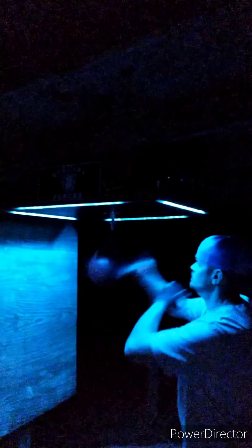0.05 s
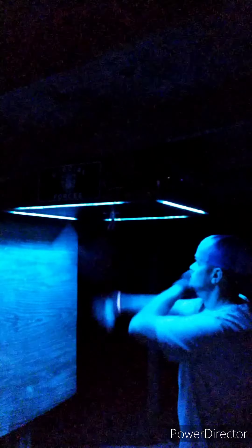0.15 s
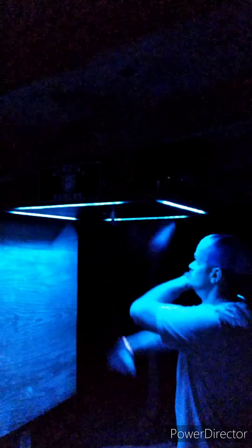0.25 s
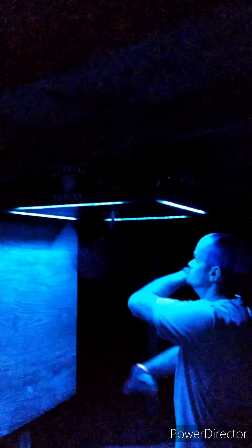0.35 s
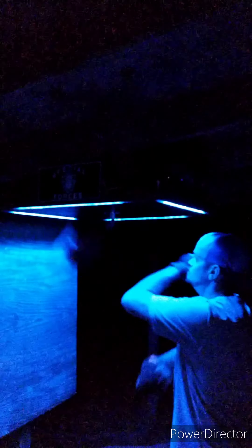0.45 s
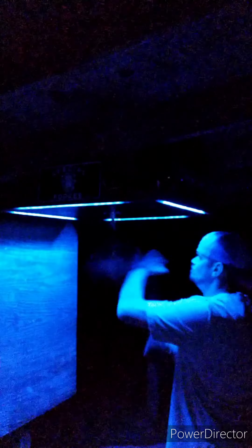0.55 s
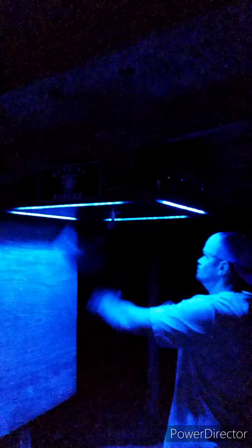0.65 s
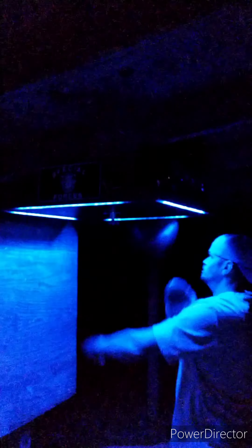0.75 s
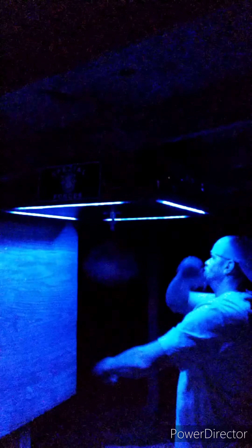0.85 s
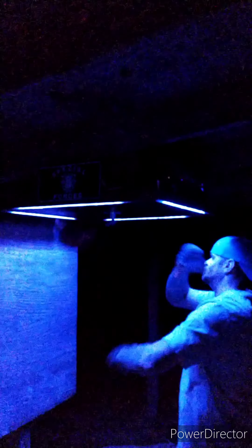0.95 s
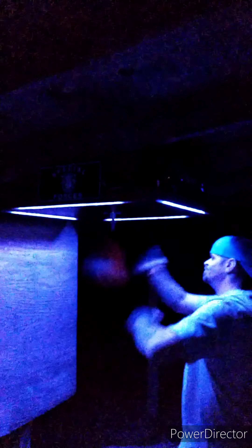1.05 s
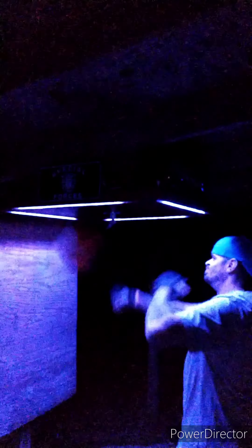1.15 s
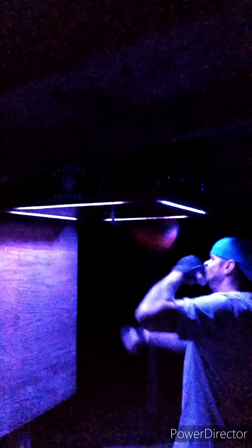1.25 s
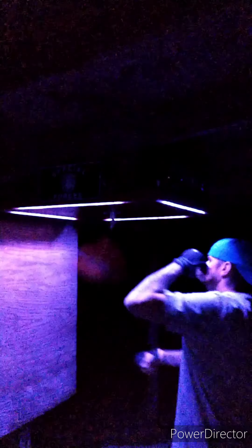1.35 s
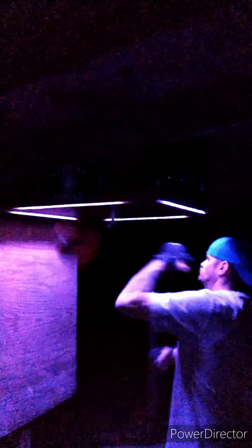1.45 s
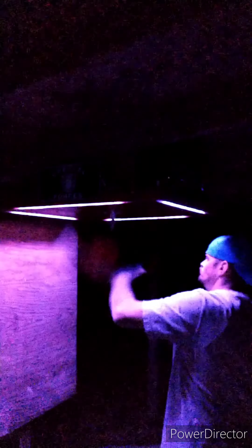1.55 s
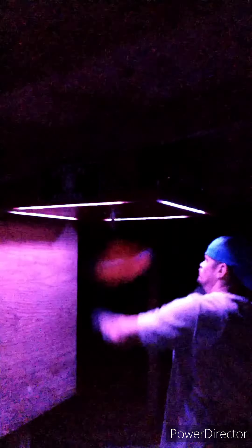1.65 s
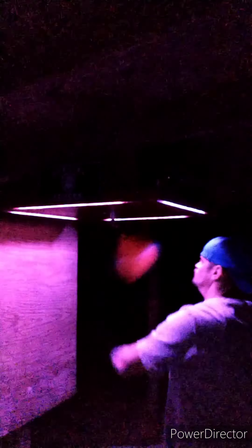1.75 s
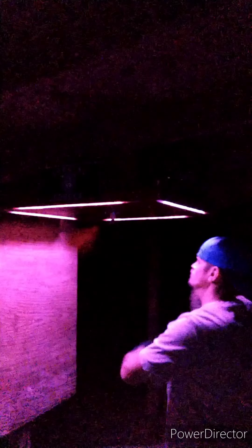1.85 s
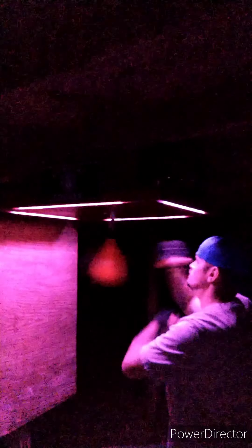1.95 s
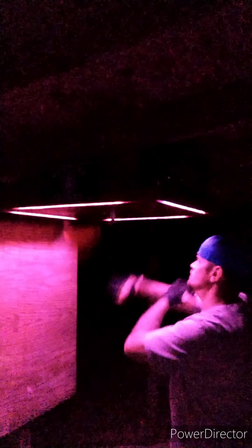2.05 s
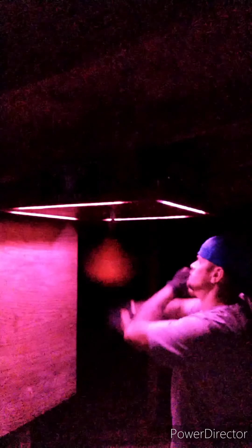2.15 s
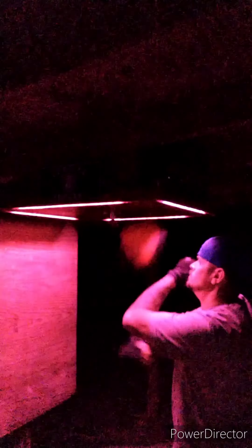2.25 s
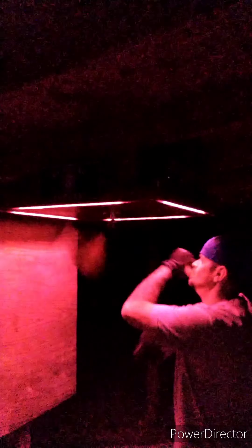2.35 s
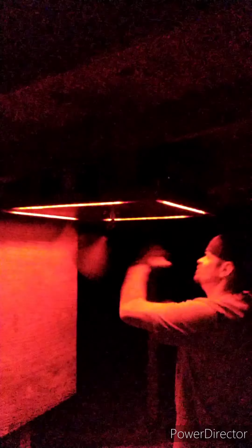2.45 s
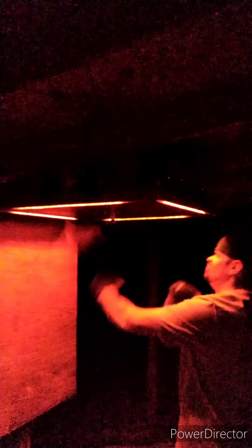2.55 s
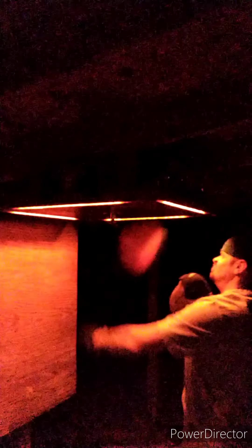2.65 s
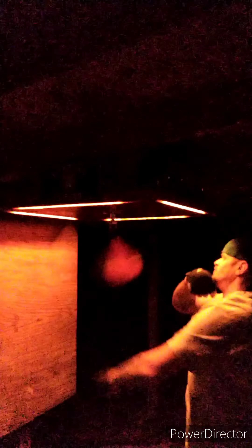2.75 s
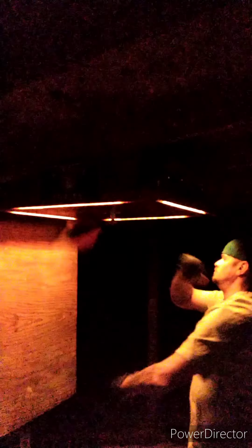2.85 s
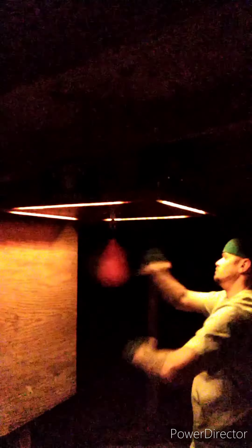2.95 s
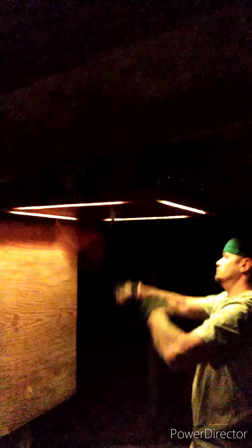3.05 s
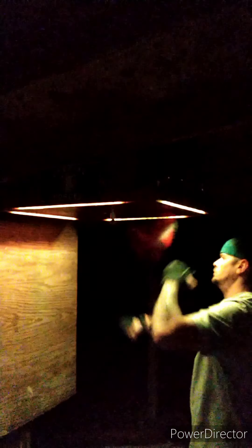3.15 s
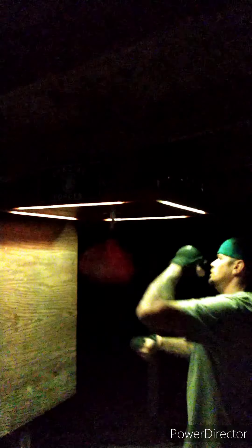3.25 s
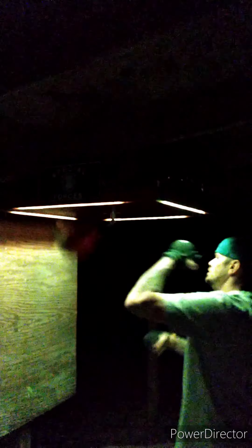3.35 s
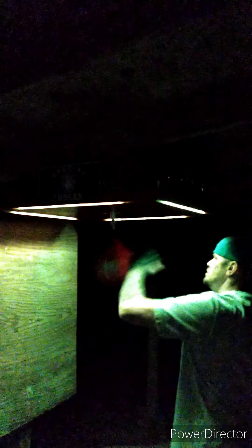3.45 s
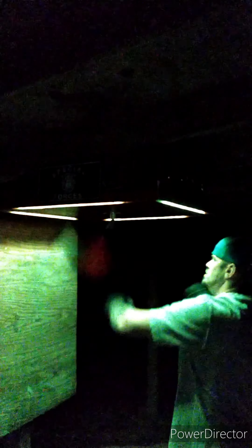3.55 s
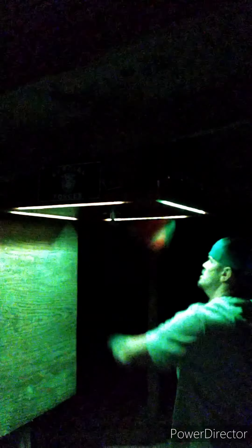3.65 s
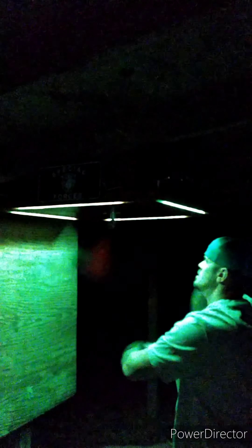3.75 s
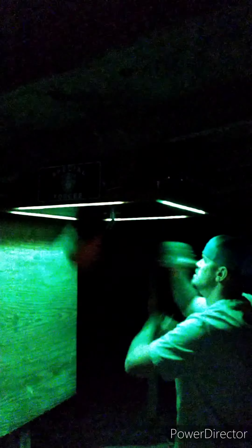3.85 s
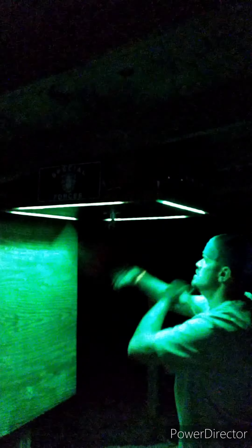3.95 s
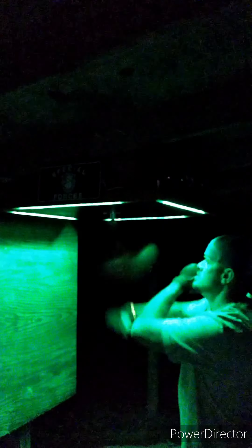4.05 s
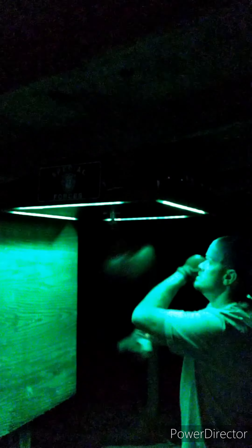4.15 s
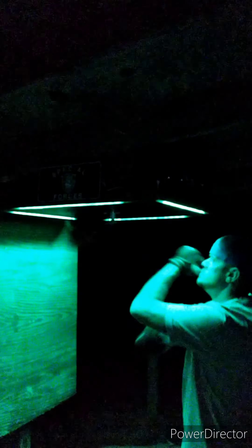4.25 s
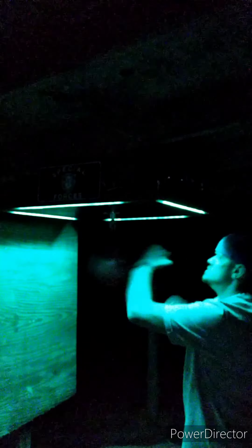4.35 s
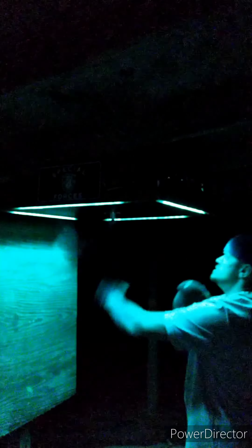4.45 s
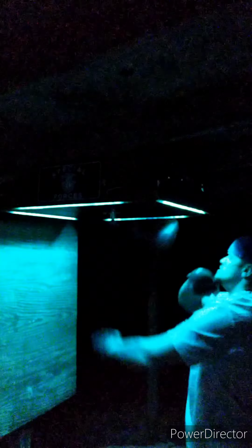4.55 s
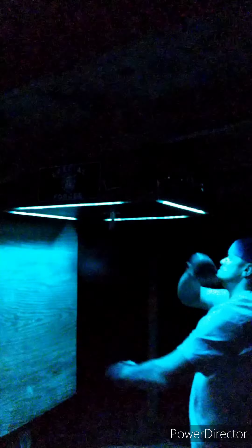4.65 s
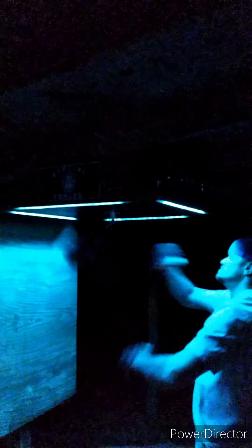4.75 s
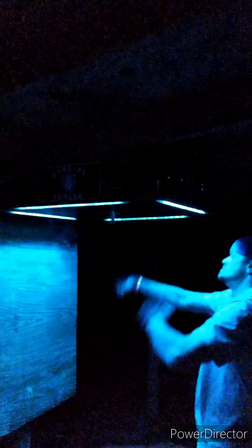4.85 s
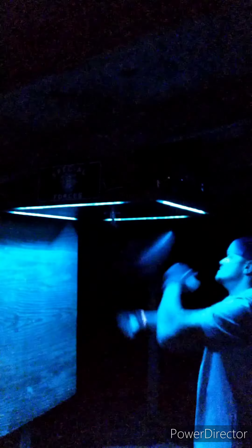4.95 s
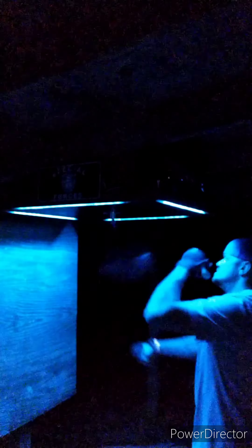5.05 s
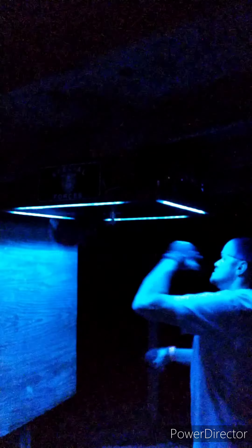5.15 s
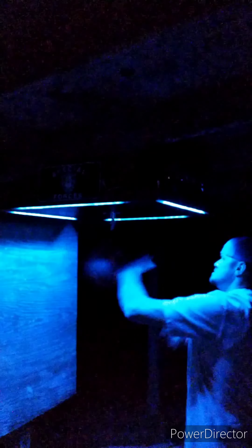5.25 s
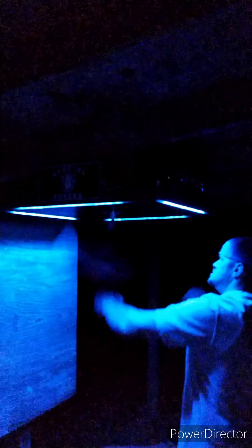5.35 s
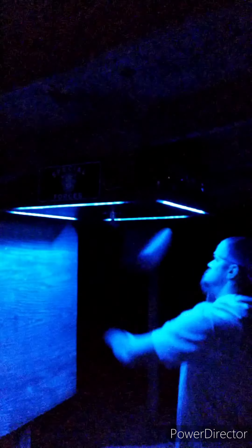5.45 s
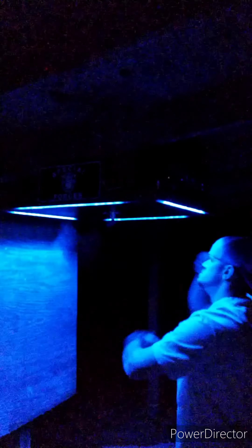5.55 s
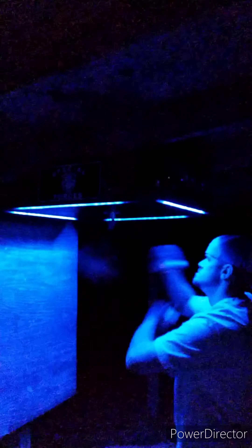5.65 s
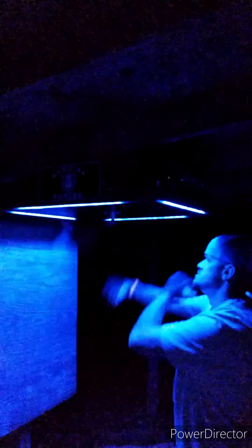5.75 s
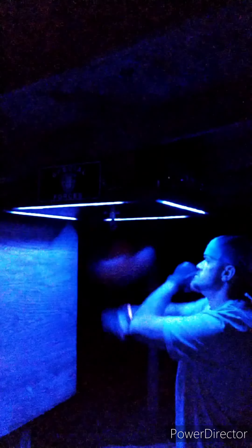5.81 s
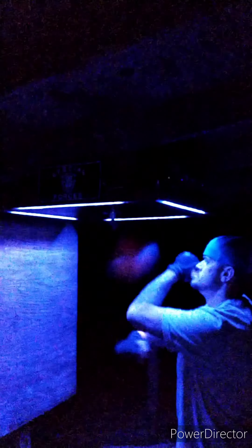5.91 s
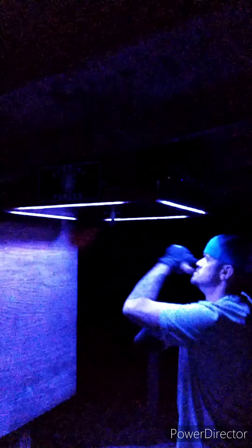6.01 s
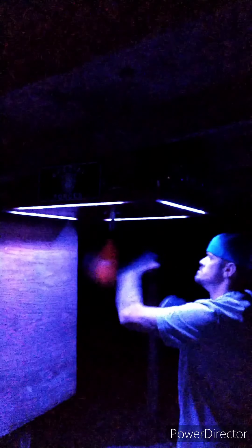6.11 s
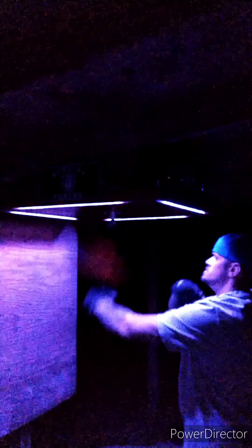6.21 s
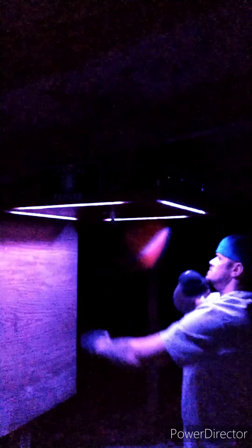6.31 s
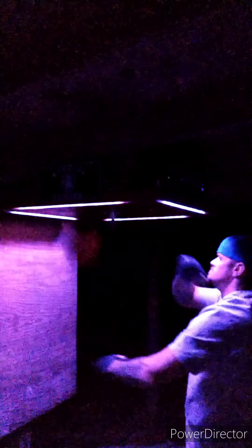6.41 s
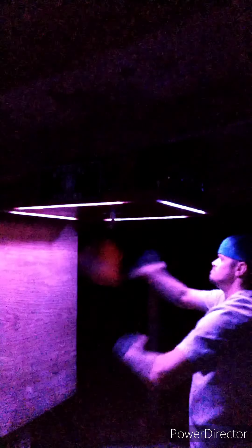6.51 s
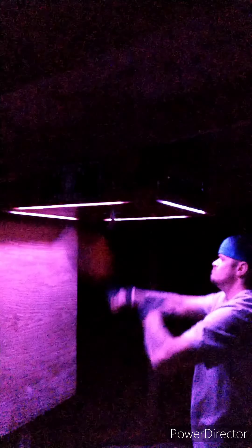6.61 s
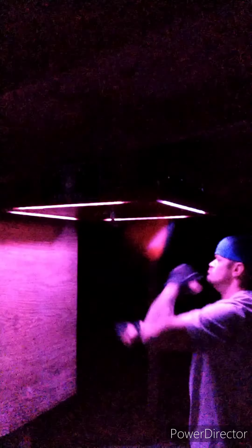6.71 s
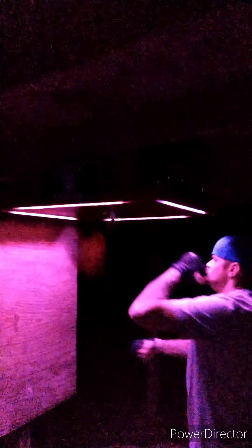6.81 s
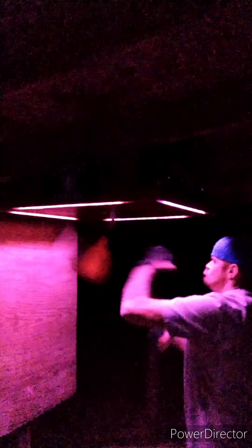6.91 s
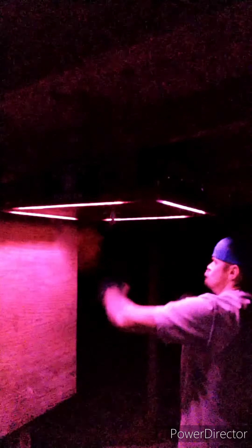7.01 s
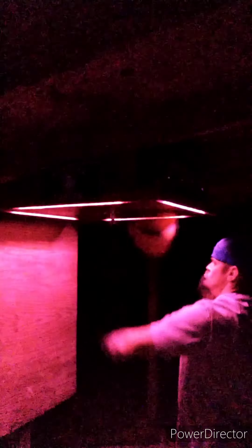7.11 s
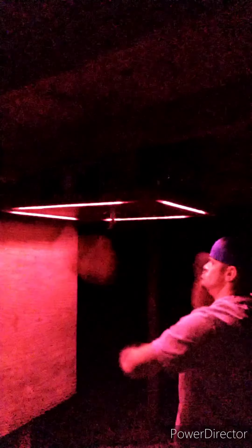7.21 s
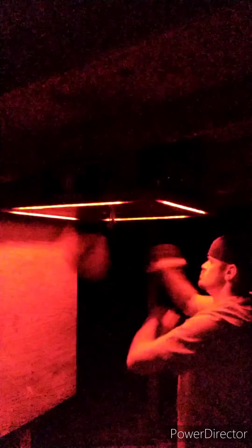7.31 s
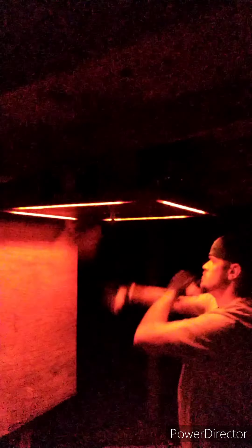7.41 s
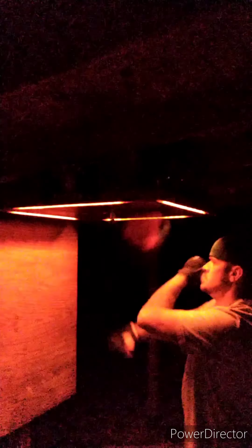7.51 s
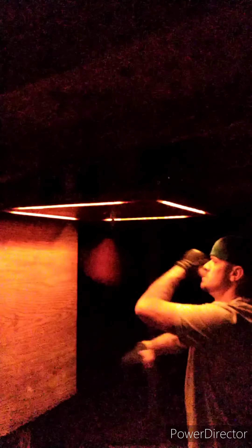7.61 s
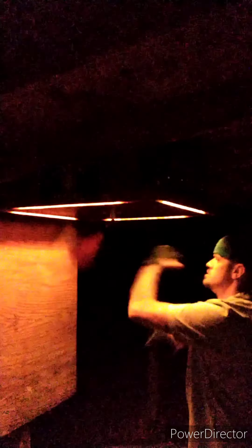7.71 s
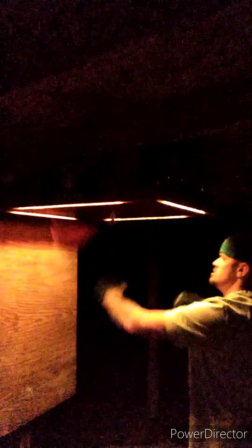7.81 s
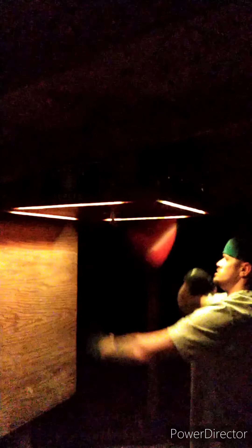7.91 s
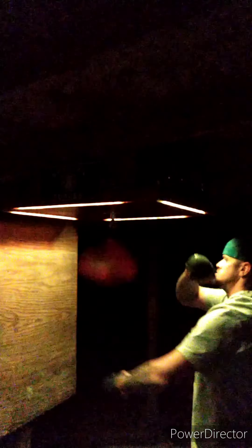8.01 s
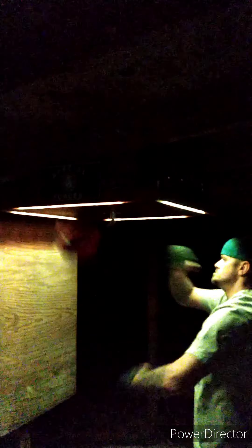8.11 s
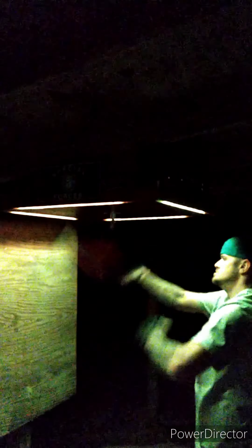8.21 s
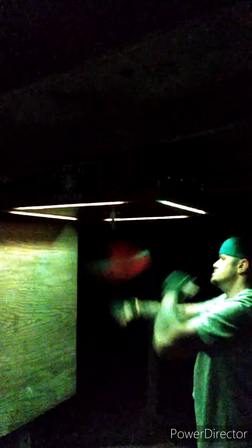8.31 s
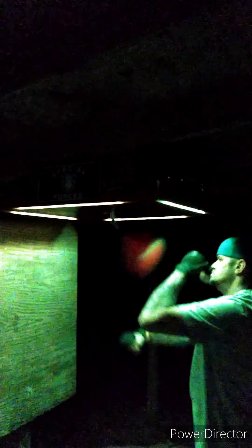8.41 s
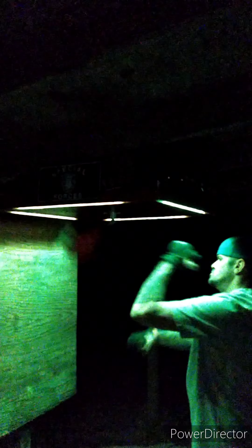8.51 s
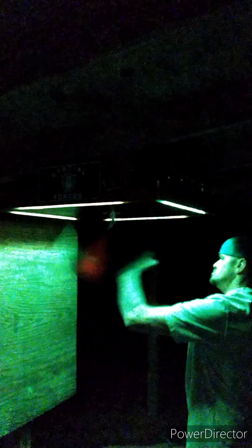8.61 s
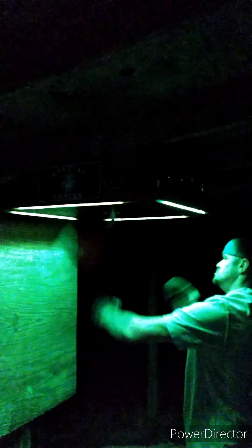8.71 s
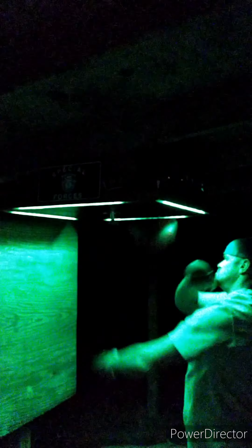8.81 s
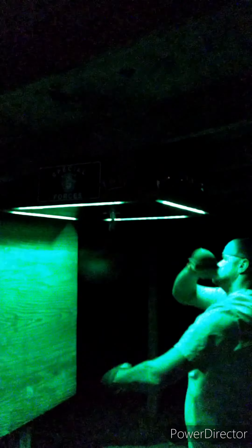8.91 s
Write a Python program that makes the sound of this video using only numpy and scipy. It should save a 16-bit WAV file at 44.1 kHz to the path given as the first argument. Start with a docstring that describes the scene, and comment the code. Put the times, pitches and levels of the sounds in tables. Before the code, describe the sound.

After a brief faint hush, a fist hits an air-filled leather bag hung on a steel swivel, and it rebounds off a wooden board in a rapid, continuous galloping rhythm. Sharp leather slaps, low hollow board booms and loose metallic ticks repeat about seven times a second until the end. Close stereo microphone, small bare room, short echoes, a barely audible cricket.

```python
"""Small bare room: first a faint hush (coloured noise) and now and then a cricket (doubly resonated noise).
From 0.23 s a fist drives an air-filled leather bag on a steel swivel under a wooden rebound board.
Air pressure builds ahead of each contact; then board and room boom (decaying modes), the links tick
(resonated grit), the leather cracks (ticks, noise bursts) and slaps (short sines); the swivel scrapes in
the swings. Fist, far edge, near edge, far edge take turns; the last blow gets one rebound. Echoes follow."""
import sys
import numpy as np
from scipy import signal
from scipy.fft import rfft, irfft, next_fast_len
from scipy.io import wavfile

SR = 44100
rng = np.random.default_rng(int(sys.argv[2]) if len(sys.argv) > 2 else 0)


def output_pcm(signal):
    """Save a mono or channel-first signal as 16-bit PCM at the path in sys.argv[1].

    Samples are clipped to [-1, 1] before scaling.
    """
    pcm = np.clip(np.atleast_2d(signal).T, -1, 1) * 32767
    wavfile.write(sys.argv[1], SR, np.round(pcm).astype(np.int16))


N = 395577
SOUND_M_PER_S = 343

# room hush spectrum: f/Hz, relative level/dB
HUSH_SPECTRUM = [(18, -31), (30, -8), (112, -3), (404, -20), (2540, -22), (3140, -24), (5590, -23),
                 (10800, -23), (16000, -23)]
HUSH_RMS_DB = -67  # ahead of the port colour
# cricket chirps: t/s, length/s, level/dB
CRICKET_CHIRPS = [(0.072, 0.037, -66), (2.346, .02, -70), (2.42, 0.11, -59), (2.596, 0.018, -58),
                  (3.404, 0.054, -56), (3.882, 0.051, -57), (4.314, 0.11, -66), (4.777, 0.061, -64),
                  (7.5, .03, -50)]
CRICKET_HZ = 7490
# bag contacts, in turn fist, far edge, near edge, far edge:
# t/s, relative slap level/dB, relative boom level/dB, relative chatter level/dB, slap pitch f/Hz, left-right/dB
BAG_CONTACTS = [ (.23, -32.5, -37, -48, 1010, 0), (0.283, -13.5, -18, -26.5, 920, -13),
                (.412, -18, -26, -32, 810, -16), (.58, -27.5, -25.5, -42.5, 920, 12),
                (.719, -14, -20, -39, 884, -3.5), (.791, -12.5, -18, -23.5, 896, -6),
                (.933, -17, -26, -28, 1010, -3), (1.116, -24, -26.5, -39.5, 904, -11),
                (1.243, -15.5, -22.5, -36.5, 750, -8), (1.301, -15, -16.5, -19.5, 990, 3),
                (1.429, -17.5, -25.5, -26, 810, -4.5), (1.597, -23, -24, -41, 860, -9),
                (1.708, -15, -24.5, -38, 810, -2), (1.764, -16, -13, -22.5, 810, -12),
                (1.884, -15.5, -23.5, -26.5, 930, -5), (2.041, -19.5, -22, -27, 910, -13),
                (2.17, -11.5, -20.5, -33, 1050, -11), (2.238, -14.5, -16, -20, 840, -1),
                (2.37, -16, -24, -30.5, 900, -4), (2.541, -24, -25, -35, 910, -10),
                (2.644, -17.5, -20, -34.5, 1040, -4), (2.699, -14.5, -19.5, -20, 890, -7),
                (2.831, -14.5, -22.5, -31, 1010, -5), (2.999, -24, -26, -38, 950, -6),
                (3.122, -18.5, -18, -34.5, 950, -5), (3.182, -17.5, -15.5, -20.5, 774, -3),
                (3.312, -14.5, -23, -26.5, 1030, -2), (3.479, -21, -23, -35.5, 836, -6),
                (3.605, -16.5, -20, -38.5, 940, -4.5), (3.668, -14.5, -14, -25.5, 972, -16.5),
                (3.796, -14, -24.5, -31, 980, -3), (3.959, -19.5, -22, -26.5, 930, -10.5),
                (4.077, -20.5, -18.5, -35, 1100, 0), (4.134, -15.5, -19.5, -20.5, 893, -1),
                (4.255, -17, -24.5, -28, 880, -10), (4.411, -22, -22.5, -38, 846, -12),
                (4.526, -14, -17.5, -36.5, 970, -3), (4.584, -13.5, -17.5, -20, 910, 8),
                (4.707, -16, -24.5, -25.5, 1100, 8), (4.867, -20, -22.5, -35, 880, -2),
                (4.965, -15, -20, -37, 850, 1), (5.017, -11, -14.5, -26.5, 970, -1),
                (5.146, -15.5, -23.5, -25.5, 1010, 0), (5.306, -21.5, -24.5, -37, 950, -3),
                (5.413, -14, -20, -29, 950, -4), (5.463, -14.5, -15, -21, 939, 7),
                (5.583, -15, -23.5, -22.5, 1050, -1), (5.736, -23, -22.5, -37.5, 930, -16.5),
                (5.851, -12.5, -20.5, -31, 1150, -6), (5.91, -17, -14, -25, 830, -11),
                (6.031, -17.5, -24, -29.5, 950, -4), (6.188, -20.5, -22, -26.5, 826, -11),
                (6.292, -14, -22, -42, 890, -5), (6.341, -14.5, -15, -19.5, 910, 0),
                (6.455, -19, -24.5, -24.5, 1050, 6), (6.604, -22.5, -24, -36.5, 884, -4),
                (6.704, -14, -20.5, -33, 910, -1), (6.752, -15, -16, -19.5, 910, 9),
                (6.867, -17, -23.5, -23, 980, 1), (7.017, -23.5, -23, -34.5, 990, -15),
                (7.121, -19, -20.5, -32.5, 667, -1), (7.17, -16, -16.5, -18.5, 970, 7),
                (7.285, -17, -22.5, -24.5, 950, 5), (7.434, -18.5, -24.5, -31, 950, -14),
                (7.532, -13.5, -21.5, -35.5, 920, -8), (7.581, -12.5, -14.5, -21.5, 980, -4),
                (7.693, -19, -24.5, -23.5, 950, 11), (7.849, -18, -22, -27, 886, -7),
                (7.943, -16, -23, -33, 890, -6), (7.989, -13.5, -14, -24.5, 890, -9),
                (8.108, -18.5, -25.5, -25, 770, -11), (8.262, -19.5, -25, -35.5, 900, -10),
                (8.371, -14.5, -21.5, -35, 1010, -1), (8.421, -17.5, -14.5, -20, 900, 7),
                (8.546, -18, -26.5, -27, 970, -10), (8.712, -22, -25, -30, 910, -22.5),
                (8.812, -21, -24.5, -35, 860, -4), (8.863, -15, -17, -20, 930, -5)]
# what each place struck adds, same turn order: crack offset/dB, air offset/dB, slap decay/ms
STRUCK_PLACES = [(-2.2, 7, 0.9), (-5, 3.5, 0.92), (-0.3, 7, 0.86), (-1.9, 0, 1.34)]
CRACK_FROM_CHATTER, AIR_PER_CHATTER = 0.4, 1.472  # dB per dB
# low modes of board and room, signed strength per place struck:
# f/Hz, t60/s, fist strength, far edge strength, near edge strength, left-right/dB
BOARD_MODES = [(45.5, 0.52, 0.076, 0.022, 0.081, -1), (65.8, 0.61, 0.04, -0.069, 0.19, 2.5),
               (80.34, 0.61, 0.053, -0.16, 0.0086, 6), (94, 0.23, 0.51, 0.22, 0.59, 0.5),
               (107.8, 0.26, 0.17, 0.19, 0.51, 2), (126.2, 0.15, 0.13, 0.28, -0.4, 6),
               (168, 0.19, 0.099, 0.021, -0.059, 6.5), (211.9, 0.49, 0.062, 0.067, 0.084, -15),
               (249.7, 0.48, 0.027, -0.065, 0.12, 1.8), (280.3, 0.12, 0.26, -0.032, 0.39, -1),
               (309.4, 0.22, 0.16, 0.32, -0.22, 5), (362.3, 0.39, 0.065, 0.031, -0.065, 21),
               (636.3, 0.27, 0.096, 0.015, 0.18, 16)]
# steel swivel resonances: f/Hz, width/Hz, relative level/dB
STEEL_MODES = [(2280, 350, 6), (2856, 53, 15), (4170, 250, -8), (4700, 120, -36), (5450, 116, -7.5),
               (5520, 280, 0.5), (7600, 99, -19)]
# leather bands crack, chatter, airy top: low f/Hz, high f/Hz, decay/ms, delay/ms, rise/ms
LEATHER_BANDS = [(1100, 2656, 0.72, 0.9025, 0.05), (3220, 7080, 1, 1.103, 0.42),
                 (7400, 15300, 0.78, 0.045, 0.19)]
# gain of each leather band: level/dB
LEATHER_GAIN_DB = [2.5, 7, 7]
# tick gain of each leather band, on top of the last: level/dB
LEATHER_TICK_DB = [9, 13, 15]
# swivel scrapes and rattles as the bag swings through: t/s, relative level/dB, strongest f/Hz
SWIVEL_RATTLES = [(0.371, -21, 2550), (0.509, -29.5, 2200), (0.698, -29, 2260), (0.759, -19, 3750),
                  (1.071, -28.5, 2350), (1.389, -18, 5900), (1.529, -31, 2060), (1.843, -18.5, 5370),
                  (1.974, -31, 2130), (2.154, -28, 1870), (3.141, -14.5, 2620), (3.271, -19.5, 3400),
                  (3.406, -27.5, 2200), (3.626, -16, 1960), (3.748, -25, 3960), (3.894, -27.5, 2200),
                  (4.213, -21, 3800), (4.667, -14.5, 3820), (5.099, -23.5, 2600), (5.24, -24.5, 2600),
                  (5.984, -23.5, 2260), (6.123, -30, 2290), (6.426, -17.5, 5530), (6.817, -16.5, 2320),
                  (6.963, -25, 2580), (7.253, -22, 2500), (7.377, -19, 3640), (7.562, -16.5, 4230),
                  (7.668, -15, 3650), (7.794, -32, 2320), (8.082, -25.5, 2200), (8.22, -26, 3770),
                  (8.515, -21.5, 2280), (8.671, -23.5, 2100)]
# room echoes: f/Hz, t60 of the main decay/s, relative level/dB
ROOM_BANDS = [(206, 0.66, 7), (462, 0.27, 1.5), (790, 0.23, -11.5), (2290, 0.17, 0), (6400, 0.15, 0.5),
              (15200, 0.16, -2)]
# colour common to both microphone ports: f/Hz, gain/dB
PORT_COLOUR = [(15, 0), (35, -4), (60, 3.5), (330, 2.5), (420, 0), (600, 5.5), (1500, 2.5), (3000, -5),
               (4000, -1.5), (5700, -1.5), (7000, -4.5), (10000, -5.5), (10600, -5.5), (15000, -3),
               (16000, -16), (16700, -18)]
# ports face different ways: f/Hz, left-right/dB
PORT_FACING = [(450, 0), (1000, -4), (1500, -5), (2200, 3), (3200, 3), (4500, -1), (5700, -8), (7000, 0),
               (9500, 2), (10500, 8), (13700, 0)]
PORT_GAP_M, CUTOFF_HZ = 0.165, 16900


def amp(db):
    """Gain of a level in dB."""
    return 10 ** (np.asarray(db) / 20)


def rms_one(x):
    """Scale to unit rms."""
    return x / np.sqrt(np.mean(x ** 2) + 1e-20)


def at_hz(points, hz, column=1):
    """Read a table column along log frequency."""
    points = np.array(points)
    return np.interp(np.log(np.maximum(hz, 1)), np.log(points[:, 0]), points[:, column])


def clicks(times_s, sizes):
    """One impulse per contact."""
    out = np.full(N, 1e-18)
    at = (np.asarray(times_s) * SR).astype(int)
    out[np.minimum(at, N - 1)] = sizes
    return out


def dying(x, ms):
    """Turn each impulse into an exponential decay of the same height."""
    return signal.lfilter([1], [1, -np.exp(-1000 / (ms * SR))], x)


def soft_push(x, ms):
    """Smear each impulse into a decay of unchanged area."""
    return dying(x, ms) * 1000 / (ms * SR)


def band(x, low_hz, high_hz):
    """Band-pass."""
    sos = signal.butter(2, [low_hz, min(high_hz, 0.45 * SR)], "band", fs=SR, output="sos")
    return signal.sosfilt(sos, x)


def resonate(x, hz, width_hz):
    """Two-pole resonance, peak gain 1."""
    r = np.exp(-np.pi * width_hz / SR)
    poles = [1, -2 * r * np.cos(2 * np.pi * hz / SR), r * r]
    return signal.lfilter([(1 - r * r) / 2, 0, (r * r - 1) / 2], poles, x)


def grit(per_s, spread_db):
    """Dense uneven ticks of random sign, rms 1."""
    sizes = amp(spread_db * np.minimum(rng.exponential(1, N), 4))
    signed = sizes * rng.choice([-1, 1], N)
    return rms_one(signed * (rng.random(N) < per_s / SR))


def hush():
    """Faint steady noise of the room: white noise given the hush spectrum."""
    size = next_fast_len(N)
    colour = amp(at_hz(HUSH_SPECTRUM, np.fft.rfftfreq(size, 1 / SR)))
    noise = rng.standard_normal((2, size))
    return amp(HUSH_RMS_DB) * rms_one(irfft(rfft(noise) * colour, size)[:, :N])


def cricket():
    """Short chirps of one high, throbbing tone: noise through two narrow resonances."""
    t_s = np.arange(N) / SR
    level = np.zeros(N)
    for start_s, length_s, db in CRICKET_CHIRPS:
        to_edge_s = np.minimum(t_s - start_s, start_s + length_s - t_s)
        level += amp(db) * np.clip(to_edge_s / 0.0046, 0, 1)
    tone = resonate(rng.standard_normal(N), CRICKET_HZ, width_hz=100)
    return level * rms_one(resonate(tone, CRICKET_HZ, width_hz=100))


def contacts():
    """Times, levels, pitches and decays of all contacts; crack and air levels follow the chatter."""
    t_s, slap_db, boom_db, chatter_db, pitch_hz, pan_db = np.transpose(BAG_CONTACTS)
    crack_offset_db, air_offset_db, fall_ms = np.resize(STRUCK_PLACES, (len(t_s), 3)).T
    crack_db = crack_offset_db + slap_db + CRACK_FROM_CHATTER * (chatter_db - slap_db)
    air_db = air_offset_db + AIR_PER_CHATTER * chatter_db
    return dict(t_s=t_s, slap_db=slap_db, boom_db=boom_db, crack_db=crack_db, chatter_db=chatter_db,
                air_db=air_db, pitch_hz=pitch_hz, pan_db=pan_db, fall_ms=fall_ms)


def air_ahead(hits, ahead_db, ahead_ms):
    """Pressure builds exponentially between bag and target just before they meet."""
    strikes = clicks(hits["t_s"], amp(hits["boom_db"] + ahead_db))
    building = dying(strikes[::-1], ahead_ms)[::-1]
    return soft_push(building, 1.2)


def boom(hits, push_ms, boom_db):
    """A soft push sets the low modes going, air pressure falling first."""
    turns = slice(0, None, 4), slice(1, None, 2), slice(2, None, 4)  # fist, far edge, near edge
    pushes = [clicks(hits["t_s"][turn], amp(hits["boom_db"][turn] + boom_db)) for turn in turns]
    out = np.zeros((2, N))
    for hz, t60_s, fist, far, near, pan_db in BOARD_MODES:
        r = amp(-60 / (t60_s * SR))
        cosine = np.cos(2 * np.pi * hz / SR)
        push = fist * pushes[0] + far * pushes[1] + near * pushes[2]
        mode = signal.lfilter([1, -r * cosine], [1, -2 * r * cosine, r * r], push)
        out -= mode * amp([[pan_db / 2], [-pan_db / 2]])
    return soft_push(out, push_ms)


def jolts(hits, jolt_db, jolt_ms, swing_db, swing_ms):
    """Loose steel links tick on after every contact, and faintly all through the swing."""
    jolt = dying(clicks(hits["t_s"], amp(hits["chatter_db"] + jolt_db)), jolt_ms)
    swing = dying(clicks(hits["t_s"], amp(hits["boom_db"] + swing_db)), swing_ms)
    ticks = grit(1500, spread_db=8)
    ringing = np.zeros(N)
    for k, (hz, width_hz, db) in enumerate(STEEL_MODES):
        ringing += amp(db) * resonate(ticks, hz, width_hz) * (-1) ** k  # signs alternate
    return (jolt + swing) * rms_one(ringing)


def leather(hits):
    """Skin meeting wood or glove: in each band a sharp tick and a short gritty burst."""
    out = np.zeros(N)
    levels_db = hits["crack_db"], hits["chatter_db"], hits["air_db"]
    rows = zip(LEATHER_BANDS, levels_db, LEATHER_GAIN_DB, LEATHER_TICK_DB)
    for (low_hz, high_hz, fall_ms, late_ms, rise_ms), level_db, gain_db, tick_db in rows:
        strikes = clicks(hits["t_s"] + late_ms / 1000, amp(level_db + gain_db))
        per_width = SR / 2 / (high_hz - low_hz)  # evens out tick height over band width
        tick = amp(tick_db) * band(strikes, low_hz, high_hz) * per_width
        envelope = dying(strikes, fall_ms) - dying(strikes, min(rise_ms, fall_ms / 2))
        burst = envelope * rms_one(band(grit(9000, spread_db=0.5), low_hz, high_hz))
        out += burst - tick
    return out


def slap(hits, late_ms, rise_ms, slap_db):
    """Air squeezed out of the contact rings for a few cycles, just after the first tick."""
    out = np.zeros(N + SR)
    ms = np.arange(1000) * 1000 / SR
    for t_s, peak_db, hz, fall_ms in zip(hits["t_s"], hits["slap_db"], hits["pitch_hz"], hits["fall_ms"]):
        shape = (1 - np.exp(-ms / rise_ms)) * np.exp(-ms / fall_ms)
        at = int((t_s + late_ms / 1000) * SR)
        out[at:at + len(ms)] -= amp(peak_db + slap_db) * shape * np.sin(2 * np.pi * hz * ms / 1000)
    return out[:N]


def swings(swing_db, rise_ms, fall_ms, width_hz, broad):
    """Each swivel rattle swells and fades, a broad scrape with one region standing out."""
    out, ticks = np.zeros(N), grit(5000, spread_db=3)
    ms = np.arange(3000) * 1000 / SR
    shape = (1 - np.exp(-(ms / rise_ms) ** 2)) * np.exp(-ms / fall_ms)
    scrape = rms_one(band(ticks, 430, 4600))
    for t_s, level_db, hz in SWIVEL_RATTLES:
        at = slice(int(t_s * SR), int(t_s * SR) + len(ms))
        region = rms_one(resonate(ticks[at], hz, width_hz))
        out[at] += amp(level_db + swing_db) * shape * (region + broad * scrape[at])
    return out


def direct(knock, clatter, pan_db, echo_db, knock_pan):
    """Clatter passes the right port first; knock reaches the left early and again off the wall beside it."""
    knocks = np.array([knock + amp(echo_db) * np.roll(knock, 50), np.roll(knock, 10)])
    gap_samples = int(PORT_GAP_M / SOUND_M_PER_S * SR)
    clatters = np.array([np.roll(clatter, gap_samples), clatter])
    sides = amp([pan_db / 2, -pan_db / 2])
    return knocks * sides ** knock_pan + clatters * sides


def room(x, starts_s, onset_ms, late_db, count):
    """Dense echoes dying band by band; the bag moves, so successive contacts meet different echoes."""
    t_s = np.arange(SR * 2 // 5) / SR
    edges_hz = 150 * 2 ** np.arange(0, 7.1, 0.5)
    tail = 0
    for low_hz, high_hz in zip(edges_hz, edges_hz[1:]):
        hz = np.sqrt(low_hz * high_hz)
        fall_db = -60 * t_s / at_hz(ROOM_BANDS, hz)
        decay = amp(fall_db) + amp(fall_db / 2 + late_db)  # farther corners answer weakly but longer
        noise = band(rng.standard_normal((2, count, 1, len(t_s))), low_hz, high_hz)
        tail = tail + noise * decay * amp(at_hz(ROOM_BANDS, hz, column=2))
    onset = 1 - np.exp(-(1000 * t_s / onset_ms) ** 2)
    mid, side = rfft(tail * onset / np.sqrt(SR))
    # sound from all sides is alike at two spaced ports as sin(kd) / kd
    alike = np.sinc(2 * np.fft.rfftfreq(len(t_s), 1 / SR) * PORT_GAP_M / SOUND_M_PER_S)
    ports = irfft(np.sqrt(1 + alike) * mid + np.sqrt(1 - alike) * side * [[1], [-1]], len(t_s))
    echo_set = np.searchsorted(starts_s, np.arange(N) / SR) % count
    out = np.zeros((2, N))
    for k in range(count):
        out += signal.oaconvolve(x[None] * (echo_set == k), ports[k], axes=1)[:, :N]
    return out


def scene():
    """Background, direct contacts, boom and the room's answer."""
    background, chirps = hush(), cricket()
    hits = contacts()
    low = air_ahead(hits, ahead_db=-13.5, ahead_ms=14) + boom(hits, push_ms=0.94, boom_db=7.5)
    clatter = jolts(hits, jolt_db=-5, jolt_ms=20, swing_db=-36, swing_ms=110) + leather(hits)
    knock = slap(hits, late_ms=0.29, rise_ms=0.54, slap_db=12)
    clatter = clatter + swings(swing_db=-9.5, rise_ms=3.06, fall_ms=6.5, width_hz=900, broad=1)
    latest = np.maximum(np.searchsorted(hits["t_s"], np.arange(N) / SR) - 1, 0)
    near = direct(knock, clatter, hits["pan_db"][latest], echo_db=-4.5, knock_pan=0.36)
    sources = knock + clatter + chirps
    echoes = amp(19.5) * room(sources, hits["t_s"], onset_ms=0.87, late_db=-20.5, count=10)
    return background + chirps + low + near + echoes


def record(dry):
    """Each port colours the sound, peaks are rounded, the top is cut."""
    size = next_fast_len(N)
    hz = np.fft.rfftfreq(size, 1 / SR)
    colour = amp(at_hz(PORT_COLOUR, hz) + at_hz(PORT_FACING, hz) * [[0.5], [-0.5]])
    coloured = irfft(rfft(dry, size) * colour, size)[:, :N]
    rounded = 1.1 * np.tanh(coloured / 1.1)
    return signal.sosfilt(signal.cheby2(12, 80, CUTOFF_HZ, fs=SR, output="sos"), rounded)


dry = scene()
out = record(dry)
output_pcm(out)
```